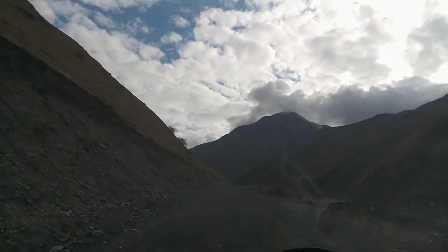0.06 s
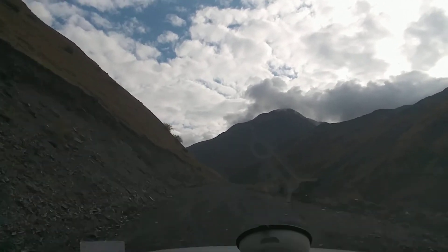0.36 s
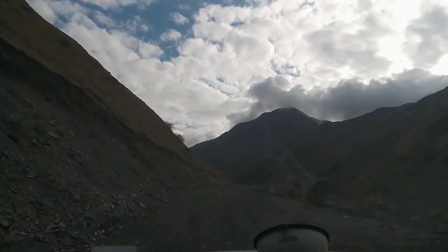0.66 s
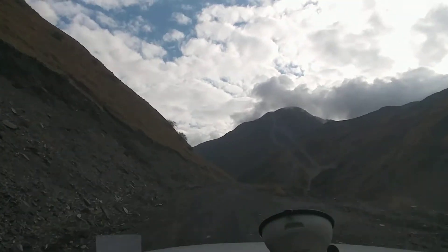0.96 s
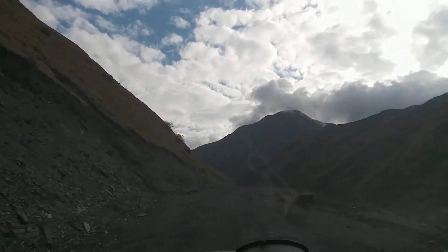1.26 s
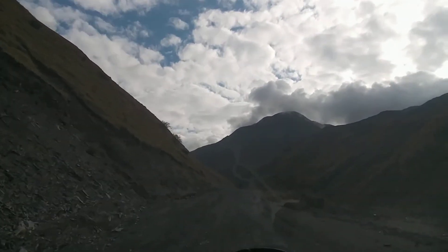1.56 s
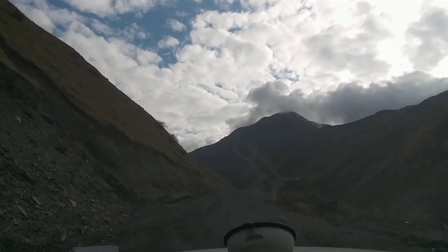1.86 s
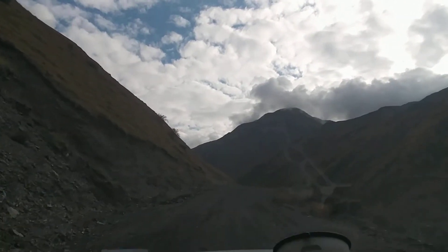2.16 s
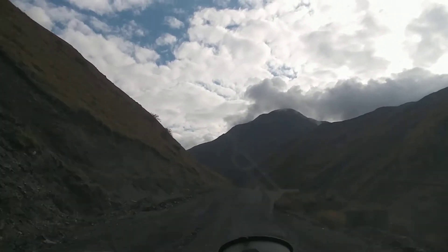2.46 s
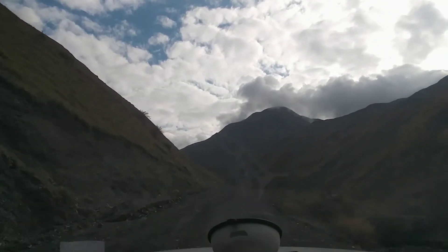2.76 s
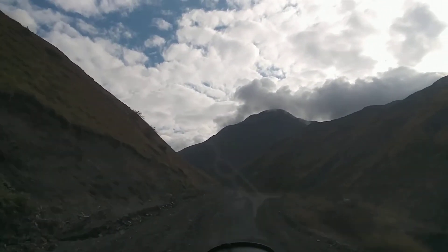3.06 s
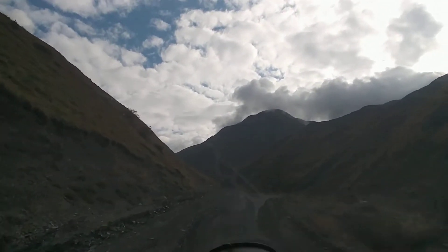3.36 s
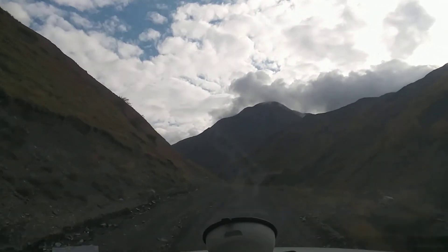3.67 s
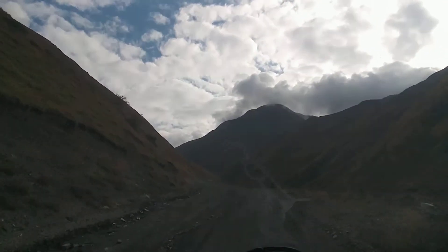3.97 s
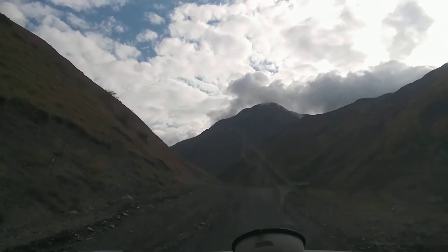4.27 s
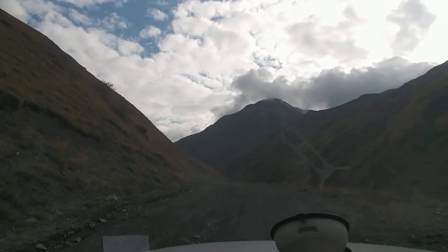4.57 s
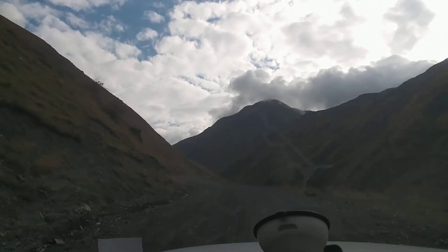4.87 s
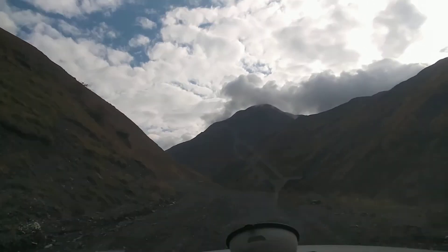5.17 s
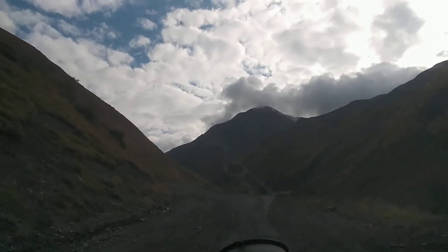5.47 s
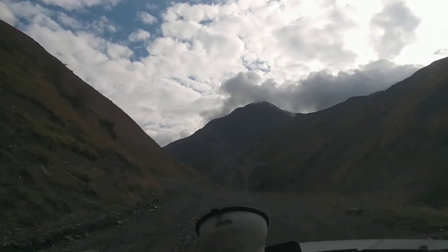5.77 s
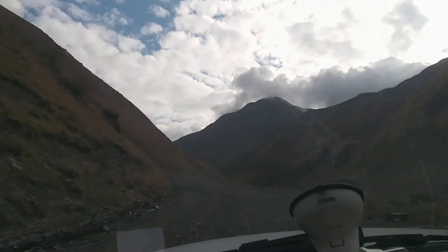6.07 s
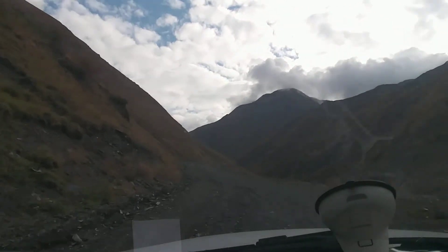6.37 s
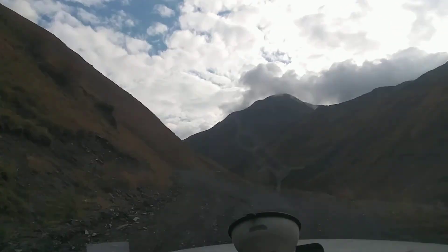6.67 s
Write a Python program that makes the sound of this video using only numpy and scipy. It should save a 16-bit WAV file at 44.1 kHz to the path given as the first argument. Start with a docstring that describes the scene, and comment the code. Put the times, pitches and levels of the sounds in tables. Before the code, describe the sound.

Inside an off-road car driving along a rough gravel track, heard from behind the windscreen. A loud, deep boom throbs unevenly throughout as the wheels cross ruts, over tyre roar and a low engine hum with a faint whine. The suspension thumps again and again, stones chatter and snap against the underside, and loose fittings knock. Trim rattles in bursts with a few faint squeaks. The clatter eases somewhat in the second half.

```python
"""Inside an off-road car on a rough gravel mountain track, behind the windscreen.
Ruts pump the cabin air into a deep boom, the track drums on the panels, the suspension thumps.
Gravel roars, chatters and snaps under the tyres; loose fittings knock, trim rattles and squeaks.
The engine hums and the driveline whines faintly. A limiter holds the boom near full scale."""
import sys
import numpy as np
from scipy import signal
from scipy.fft import rfft, irfft, next_fast_len
from scipy.io import wavfile
from scipy.ndimage import uniform_filter1d, minimum_filter1d

SR = 44100
rng = np.random.default_rng(int(sys.argv[2]) if len(sys.argv) > 2 else 0)


def log_audio(samples):
    """Write samples as a 16-bit WAV file to the path given in sys.argv[1]."""
    # one column per channel
    frames = np.atleast_2d(samples).T
    # limit to full scale, then quantise
    limited = np.clip(frames, -1, 1)
    pcm = np.round(limited * 32767).astype(np.int16)
    wavfile.write(sys.argv[1], SR, pcm)


N = 295911
TIME_S = np.arange(N) / SR

# Deep ruts. Each row: centre in seconds, level in dB, pitch in Hz.
RUTS = [(0.149, -3.5, 78.7), (.268, -2.5, 62.2), (0.544, 0, 67.4), (0.846, -7, 70), (1.052, 0, 74.8),
        (1.46, -5.5, 65.4), (1.8, -0.5, 62.8), (2.218, -4, 63.3), (2.42, 0, 70.8), (2.527, -5, 73.5),
        (2.747, -4.5, 67.8), (3.01, -4.5, 65.5), (3.212, -2.5, 70.1), (3.69, -6, 61.5), (3.96, -5.5, 70.7),
        (4.3, -5.5, 70.1), (4.736, -3, 79.7), (5.067, -2, 63.9), (5.2, -2.5, 64.2), (5.33, -3.5, 72.3),
        (5.45, -10, 71.2), (5.559, -7.5, 66.9), (5.97, -6, 68), (6.057, -3, 73.3), (6.33, -3.5, 64),
        (6.443, -2, 74.8), (6.534, -3, 59.8)]
# Strength of lesser throbs and rumble. Each row: time in seconds, level in dB.
WASHBOARD = [(0, -7.5), (.4, -6), (1.4, -8), (2.74, -5), (2.81, -8.5), (2.91, -18.5), (3.0, -5), (4.8, -7),
             (5.33, -3), (5.4, -11.5), (5.5, -5), (5.76, -6), (5.82, -11.5), (5.9, -5.5), (6.55, -9),
             (6.63, -11.5)]
# Track roughness. Each row: time in seconds, roughness over average ground in dB.
ROUGHNESS = [(0, 6.5), (.4, -1), (.52, 4.5), (.64, 2), (.82, -3), (1.0, 4.5), (1.11, -3), (1.3, 4.5),
             (1.66, 2.5), (1.77, 2), (1.86, 4.5), (1.95, 3.5), (2.1, 0.5), (2.28, 3.5), (2.7, 3),
             (2.8, -4.5), (3.15, 2.5), (3.58, -2), (3.68, -0.5), (3.76, -4), (3.9, -6), (3.98, -4),
             (4.08, -0.5), (4.57, 0), (4.67, 3.5), (4.8, 0.5), (4.9, 0.5), (4.96, -7.5), (5.04, -0.5),
             (5.2, 4), (5.44, -3), (5.9, -1), (6.71, -2)]
# Suspension thumps. Each row: time in seconds, level in dB, clunk offset in dB.
THUMPS = [(0.243, -10, -20), (0.364, -28.5, 11.5), (0.421, -11.5, -13), (1.028, -8.5, -8.5),
          (1.369, -18.5, -3.5), (1.92, -14, -10.5), (2.519, -20.5, -18.5), (2.594, -10.5, -21.5),
          (3.165, -11, -26), (3.324, -26, -3), (3.348, -21.5, 0), (3.561, -5, -26), (3.624, -11.5, -33),
          (4.104, -10, -24), (4.597, -10.5, -10), (4.621, -8, -16), (4.79, -13.5, -23), (5.133, -18.5, -7),
          (5.704, -16.5, -12), (5.785, -12.5, -24), (5.873, -22, -7.5), (5.904, -6, -32),
          (6.152, -16.5, -27)]
# Engine firing note. Each row: time in seconds, level in dB.
ENGINE = [(0, -23), (1.5, -18), (2.8, -28), (3.2, -19.5), (4.2, -22.5), (4.8, -17), (5.4, -19.5),
          (6.4, -17), (6.71, -32.5)]
# Blows on the body shell. Each row: start in seconds, level in dB, pitch in Hz.
SHELL_BLOWS = [(.243, -16, 350), (.638, -24, 360), (1.026, -17, 342), (1.194, -21, 376), (2.608, -20, 396),
               (2.642, -25, 463), (3.336, -23, 456), (3.36, -20, 423), (3.423, -20, 488),
               (3.484, -13.5, 310), (3.542, -13, 320), (3.57, -18, 295), (3.668, -26, 393),
               (4.159, -22, 343), (4.338, -18, 352), (4.594, -16.5, 441), (4.62, -22, 520),
               (5.139, -17, 376)]
# Knocks of a loose fitting. Each row: start in seconds, level in dB, panel re ring in dB.
KNOCKS = [(0.1658, -25.5, -1), (0.329, -30.5, -15), (0.392, -31.5, -14), (0.589, -35.5, -3),
          (.6994, -40, -8), (0.9577, -33, -6), (1.0157, -28, -13), (1.1488, -38.5, -8), (1.195, -31, -10),
          (1.3783, -35, -4), (1.436, -37, -4), (1.4642, -42, -4), (1.513, -28.5, 0.5), (1.5747, -34.5, 0),
          (1.6433, -32.5, -10), (1.743, -34, -3), (1.8648, -34, 5), (1.923, -33, 7), (2.0528, -36, 2),
          (2.159, -39, -5), (2.238, -35, 3), (2.312, -31, -4), (2.3723, -32, -16), (2.425, -33, 3),
          (2.487, -30.5, -1.5), (2.623, -27, -7), (2.689, -29.5, -7), (2.9668, -37, 6), (3.0046, -40, -10),
          (3.0747, -37, 0), (3.245, -32, -1), (3.324, -34, 0), (3.5794, -33, 1), (3.6647, -35.5, -6),
          (3.7944, -38.5, -1), (3.947, -43.5, 12), (4.0034, -40, 0), (4.027, -34.5, 6.5),
          (4.2943, -35, 2.5), (4.3257, -34, -8), (4.3992, -39, -2), (4.431, -37, -2), (4.561, -40, -8),
          (4.6677, -30, -16), (4.698, -33.5, 2.5), (4.7163, -37, 2), (4.7552, -34, -2), (4.82, -37, 2),
          (5.0146, -39, -2), (5.065, -32.5, 1), (5.131, -34, -4), (5.1986, -25, -14), (5.214, -31, -11),
          (5.265, -33, -3), (5.3247, -31.5, -6), (5.5763, -39, 0), (5.7686, -31, -15), (5.904, -37, -1),
          (6.2566, -39, -5), (6.3007, -40, 10)]
# Modes of the fitting. Each row: frequency in Hz, level in dB, T60 in seconds.
FITTING_MODES = [(950, -8, .05), (1150, -5, .04), (1380, -2, .04), (1500, -1, .045), (1640, 0, .045),
                 (1845, 0, .045), (2400, -9, .03), (2650, -9, .03), (3080, -12, .025)]
# Stone snaps. Each row: start in seconds, level in dB.
SNAPS = [(0.0924, -28), (0.2208, -30), (0.575, -29), (.6714, -31), (0.7142, -30.5), (0.7452, -30.5),
         (0.902, -33.5), (1.1932, -29.5), (1.2228, -30), (1.4442, -30), (1.5896, -29), (1.9544, -34.5),
         (2.164, -34), (2.3112, -34.5), (2.505, -31), (2.591, -29), (3.0032, -30.5), (3.3204, -33.5),
         (3.4283, -27), (3.4735, -32), (3.4978, -29), (3.556, -32), (3.664, -34.5), (3.714, -34.5),
         (4.165, -40), (4.3122, -36), (4.8214, -37), (5.2105, -30.5), (5.2644, -33.5), (5.7728, -30.5)]
# Jolts. Each row: start in seconds, rattle level in dB, hold in seconds, jingle re rattle in dB.
JOLTS = [(.003, -36, 0.062, -3.5), (0.091, -36.5, 0.076, -10), (0.22, -38, 0.032, -8),
         (0.327, -35, 0.082, -10.5), (0.564, -38, 0.036, -10.5), (0.67, -38.5, 0.082, -16),
         (0.887, -33.5, 0.018, -19), (1.011, -32.5, 0.038, -11.5), (1.18, -38, 0.026, -11),
         (1.281, -38, 0.086, -9.5), (1.442, -40.5, 0.12, -12), (1.645, -41, 0.056, -11),
         (1.82, -34.5, 0.14, -25), (2.18, -35.5, 0.071, -11.5), (2.278, -39, 0.069, -4),
         (2.595, -32, 0.054, -11.5), (2.711, -32.5, 0.026, -19.5), (3, -37.5, 0.0099, -24),
         (3.238, -41, 0.014, -18), (3.097, -43, 0.031, -15), (3.374, -40.5, 0.026, -8.5),
         (3.421, -39, 0.1, -12), (3.552, -32.5, 0.039, -17.5), (3.66, -43, 0.018, -24),
         (4.01, -39, 0.062, -16), (4.311, -37, 0.062, -29.5), (4.432, -42.5, 0.062, -11.5),
         (4.678, -45, 0.053, -15), (4.745, -50, 0.022, 1), (4.83, -42.5, 0.088, -16),
         (5.104, -38.5, 0.033, -11.5), (5.198, -37, 0.018, -3.5), (5.297, -44, 0.052, -11.5),
         (5.62, -45.5, 0.069, -11), (5.769, -47, 0.16, -4.5), (5.948, -39.5, 0.025, -4),
         (6.076, -52, 0.045, -2), (6.194, -53.5, 0.066, -3), (6.413, -48, 0.086, -4)]
# Resonances of small metal parts. Each row: centre in Hz, gain of the added band in dB.
METAL_BANDS = [(4430, -6), (5790, -8), (7600, -8), (8950, -4)]
# Gears. Each row: time in seconds, mesh pitch in Hz, mesh level in dB, upper pair level in dB.
GEARS = [(0, 357.2, -35.5, -56), (.8, 360.4, -37, -50), (1.2, 358.2, -35, -43), (2, 353.2, -35.5, -44),
         (2.7, 351, -36, -47.5), (3.2, 350, -38, -48), (4.3, 344.2, -38.5, -53.5), (5.2, 348, -37, -46.5),
         (5.8, 347.4, -42, -52.5), (6.0, 345.7, -36.5, -42.5), (6.6, 347.2, -38, -46)]
# Upper gear tones. Each row: multiple of the mesh pitch, level offset in dB.
UPPER_PAIR = [(2.475, -5), (2.53, 0)]
# Axle whine. Each row: time in seconds, pitch in Hz, level in dB.
AXLE = [(0, 760, -44.5), (.35, 760, -47.5), (.8, 737, -47), (2.0, 725, -46), (2.6, 735, -46),
        (3.0, 730, -43.5), (3.6, 715, -48), (4.2, 703, -46), (4.8, 712, -45), (5.4, 722, -50.5),
        (5.9, 724, -46), (6.3, 720, -43.5), (6.71, 723, -54)]
# Two engine drone tones. Each row: time in seconds, lower tone level in dB, upper tone level in dB.
DRONE = [(0, -27, -63), (1, -34, -62), (1.6, -42, -61), (5.8, -43, -56), (6.05, -41.5, -47),
         (6.71, -38, -42)]
# Trim squeaks. Each row: start in seconds, level in dB, length in seconds.
SQUEAKS = [(1.391, -46, .03), (1.442, -55, .025), (1.485, -48, .05), (1.665, -51, .03), (2.912, -51, 0.03),
           (3.595, -50, 0.042), (3.658, -53, .025), (4.084, -55, .035), (5.633, -53, 0.058)]
# Left-right likeness of cabin noise. Each row: frequency in Hz, coherence from 0 to 1.
COHERENCE = [(60, 0.95), (120, 0.96), (250, 0.83), (500, 0.54), (1000, 0), (4000, 0)]
# Spectra of the noise layers. Each row: frequency in Hz, relative gain in dB.
RUMBLE_EQ = [(15, -29.5), (28, -28), (36, -21.5), (46, -3), (57, 9.5), (68, -3.5), (80, -5.5), (92, 5.5),
             (110, -16.5), (170, -39)]
PANEL_EQ = [(50, -35.5), (85, -4), (108, 2.5), (135, -3.5), (165, -6), (205, -9), (245, -14.5),
            (300, -15.5), (380, -29.5), (600, -37.5), (1500, -89)]
TYRE_EQ = [(150, -25.5), (300, 1), (380, -0.5), (480, -1), (600, -5), (700, -7), (800, -9.5), (880, -9),
           (960, -13), (1300, -17), (2200, -23), (4000, -31.5), (9000, -76)]
SNAP_EQ = [(600, -25.5), (1300, 0.5), (2000, 0.5), (2600, -0.5), (2980, 6.5), (3400, 0), (4300, -7.5),
           (5500, -17), (8000, -21), (9600, -41.5)]
TRIM_EQ = [(400, -25.5), (800, 7.5), (1350, 5.5), (1850, -1.5), (2300, -1.5), (3100, -5), (3700, -7.5),
           (4400, -12), (5200, -21), (9000, -48.5)]
GRAVEL_EQ = [(400, -30.5), (900, 2.5), (1350, 6), (1650, -1), (2100, -3), (2600, -4.5), (3150, -4),
             (3700, -12), (4400, -20), (5200, -27), (9000, -51.5)]
JINGLE_EQ = [(1500, -20), (3000, 2.5), (4300, 3.5), (5200, -1), (6500, -3), (7700, -4.5), (8700, -11),
             (9600, -23), (10500, -32.5), (15000, -21.5)]
THUD_EQ = [(70, -25.5), (170, 3), (240, 0), (330, -9.5), (450, -22), (1000, -55.5)]
CLUNK_EQ = [(200, -26.5), (380, .5), (520, -1.5), (700, -10), (1100, -16), (3000, -66)]
HISS_EQ = [(2000, -9), (5000, -7), (8000, -2.5), (9800, -20), (15000, -14)]


def boom(throb_s=.128, sway_depth=.12, sway_hz=9, rumble_db=-7):
    """Each rut pumps the cabin air through a few deep swings, over a low rumble."""
    throbs = np.zeros((2, N))
    swell = np.hanning(int(throb_s * SR)) ** .75
    t = TIME_S[:len(swell)]
    for centre_s, db, hz in list(RUTS) + lesser_ruts():
        start_cycles, sway_cycles = rng.random(2)
        # Neighbouring air modes take turns, so the pitch sways.
        sway = sway_depth * np.sin(2 * np.pi * (sway_cycles + sway_hz * t))
        phase = 2 * np.pi * (start_cycles + np.cumsum(hz * (1 + sway)) / SR)
        add(throbs, undb(db + 1) * swell * np.sin(phase + np.array([[.1], [0]])), centre_s - throb_s / 2)
    rumble = steady(colour(cabin_noise(), RUMBLE_EQ), span_s=.082)
    rumble *= undb(curves(WASHBOARD)[0] + rumble_db)
    rocking = undb(np.array([[1], [-1]]) * walk(18))  # pressure shifts from side to side
    return pan(throbs * rocking + rumble, left_db=1)


def lesser_ruts(spacing_s=.108, pitch_hz=69):
    """The wheels hop at a nearly even pace between deep ruts; rows as in RUTS."""
    marks_s = [-spacing_s / 2] + [rut[0] for rut in RUTS] + [TIME_S[-1] + spacing_s / 2]
    hops_s = []
    for from_s, to_s in zip(marks_s, marks_s[1:]):
        steps = max(round((to_s - from_s) / spacing_s), 1)
        hops_s.extend(np.linspace(from_s, to_s, steps + 1)[1:-1])
    late, strength, detune = rng.standard_normal((N // 1000, 3))[:len(hops_s)].T
    db = np.interp(hops_s, *np.transpose(WASHBOARD)) + .5 * strength
    return list(zip(hops_s + .0054 * late, db, pitch_hz + 5.33 * detune))


def panel_drumming():
    """The track drums on floor and doors."""
    drumming = steady(colour(cabin_noise(), PANEL_EQ), span_s=.14)
    return pan(drumming * road_gain(-16, slope=.84, flutter_db=1.75), left_db=1)


def tyre_roar():
    """Stones roar through the tyres."""
    roar = colour(cabin_noise() * undb(1.47 * walk(70)), TYRE_EQ)
    return pan(roar * road_gain(-29.5, slope=.71), left_db=3.5)


def suspension_thumps(t60_s=.1, rise_s=.018, lead_s=.004):
    """A wheel drops into a hole and shakes dense body modes; sharp edges add a higher clunk."""
    thud_gain, clunk_gain = np.zeros((2, N))
    t = TIME_S[:SR // 4]
    push = fade(t, t60_s) * (1 - fade(t, rise_s))
    for time_s, db, clunk_db in THUMPS:
        add(thud_gain, undb(db - 1) * push, time_s - lead_s)
        add(clunk_gain, undb(db + clunk_db + 1.5) * push, time_s - lead_s)
    thud = steady(colour(cabin_noise(), THUD_EQ), span_s=.01)
    clunk = steady(colour(cabin_noise(), CLUNK_EQ), span_s=.0099)
    return pan(thud * thud_gain + clunk * clunk_gain, left_db=1.5)


def engine_hum():
    """The engine hums at its firing rate, two octaves under the gear mesh."""
    firing_hz = curves(GEARS)[0] / 4
    return pan(tone(firing_hz, curves(ENGINE)[0], lead_rad=.1, waver=.004), left_db=.8)


def shell_thuds(t60_s=.039, contact_s=.007, overtone_ratio=1.42, overtone_db=-11):
    """A blunt blow rings one panel of the shell, briefly and hollowly."""
    out, t = np.zeros((2, N)), TIME_S[:SR // 5]
    attack = np.sin(np.pi / 2 * np.minimum(t / contact_s, 1)) ** 2
    envelope = attack * fade(np.maximum(t - contact_s, 0), t60_s)
    for start_s, db, hz in SHELL_BLOWS:
        phase = 2 * np.pi * hz * t + .5 * rng.standard_normal((2, 1))
        ring = np.sin(phase) + undb(overtone_db) * np.sin(overtone_ratio * phase)
        add(out, undb(db) * envelope * ring, start_s)
    return pan(out, left_db=-.5)


def fitting_knocks(bounce_s=.003, bounce_db=-8, left_lead_s=.00012):
    """A loose fitting left of centre clacks grittily and bounces once; its panel adds a dull note."""
    out, t = np.zeros((2, N)), TIME_S[:SR // 8]
    mode_hz, mode_db, t60_s = np.transpose(FITTING_MODES)[:, :, None]
    for start_s, db, panel_db in list(KNOCKS) + taps():
        detune, strength = rng.standard_normal((2, len(FITTING_MODES), 1))
        seating = 1 + .035 * rng.standard_normal()  # it sits differently each time
        modes = np.sin(2 * np.pi * mode_hz * seating * (1 + .02 * detune) * t)
        envelopes = undb(mode_db + 3.5 * strength) * fade(t, t60_s)
        ring = band(np.sum(envelopes * modes, axis=0), 600, 3500)
        grit = rng.standard_normal(len(t)) * (rng.random(len(t)) < .04)
        crack = band(grit, 1000, 3400) * fade(t, .04)
        panel = band(rng.standard_normal(len(t)), 670, 1300) * fade(t, .047)
        blow = (unit(ring) + undb(-6) * unit(crack) + undb(panel_db) * unit(panel)) * undb(db - 15.2)
        direct = stereo(blow, -left_lead_s)
        add(out, direct + reflections(blow), start_s)
        add(out, direct * undb(bounce_db), start_s + bounce_s * (.5 + rng.random()))
    return pan(out, left_db=1)


def taps(count=8, base_db=-40, spread_db=2.5, panel_db=-4.5):
    """Light knocks at random times, harder on rough ground; rows as in KNOCKS."""
    starts_s = (np.arange(count) + rng.random(count)) / count * TIME_S[-1]
    levels_db = base_db + np.interp(starts_s, *np.transpose(ROUGHNESS))
    levels_db -= spread_db * rng.standard_normal(count)
    return [(start_s, db, panel_db) for start_s, db in zip(starts_s, levels_db)]


def stone_snaps(t60_s=.024, rebound_s=.0064, rebound_db=-7):
    """Stones crack against the underside and rebound once."""
    out, t = np.zeros((2, N)), TIME_S[:SR // 10]
    for start_s, db in SNAPS:
        contact = rng.standard_normal((2, len(t))) * fade(t, t60_s)
        gap_s = rebound_s * (.5 + rng.random())
        add(out, contact * undb(db), start_s)
        add(out, contact[::-1] * undb(db + rebound_db), start_s + gap_s)
    return colour(out, SNAP_EQ) * np.std(out) * undb(-5)


def chatter():
    """Gravel chatters throughout; jolts shake the trim in coarse bursts."""
    gravel = colour(contacts(rate_hz=900, spread_db=3.4, t60_s=.025, wet_db=1), GRAVEL_EQ)
    trim = colour(contacts(rate_hz=800, spread_db=2.6, t60_s=.03, wet_db=4), TRIM_EQ)
    gravel_gain = road_gain(-45.5, slope=1, flutter_db=-.5) * pre_jolt_swell()
    trim_gain, _ = jolt_gains()
    return pan(gravel * gravel_gain + trim * trim_gain, left_db=-.5)


def metal_jingle(half_width_hz=70):
    """Rough ground and jolts set small metal parts ringing."""
    hits = colour(contacts(rate_hz=600, spread_db=2, t60_s=.03, wet_db=8), JINGLE_EQ)
    ring = sum(undb(db) * band(hits, hz - half_width_hz, hz + half_width_hz) for hz, db in METAL_BANDS)
    ground_gain = road_gain(-58.5, slope=1.5, flutter_db=1.5) * pre_jolt_swell()
    _, jolt_gain = jolt_gains()
    return pan(unit(hits + ring) * np.hypot(ground_gain, jolt_gain), left_db=1.5)


def jolt_gains(attack_s=.0016, t60_s=.16):
    """Trim and jingle gains: each jolt starts them, holds, then lets them settle."""
    gains, t = np.zeros((2, N)), TIME_S[:SR // 2]
    for start_s, db, hold_s, jingle_db in JOLTS:
        envelope = np.minimum(t / attack_s, 1) * fade(np.maximum(t - hold_s, 0), t60_s)
        add(gains, undb([[db], [db + jingle_db]]) * envelope, start_s)
    return gains


def pre_jolt_swell(length_s=.071, rise_db=2):
    """Gain that rises slightly just before each jolt."""
    db = np.zeros(N)
    for start_s, *_ in JOLTS:
        add(db, rise_db * np.sqrt(np.hanning(int(length_s * SR))), start_s - length_s)
    return undb(db)


def driveline_whine(drone_ratios=(.795, 1.631)):
    """The engine drones, the axle whines and meshing gears sing faintly."""
    mesh_hz, mesh_db, upper_db = curves(GEARS)
    drone = sum(tone(mesh_hz * ratio, db, lead_rad=1) for ratio, db in zip(drone_ratios, curves(DRONE)))
    mesh = tone(mesh_hz, mesh_db, lead_rad=.41)
    axle = tone(*curves(AXLE), lead_rad=-.05, waver=.006, flutter_db=3)
    upper = sum(tone(mesh_hz * ratio, upper_db + db, lead_rad=-1.6, waver=.00802, flutter_db=3)
                for ratio, db in UPPER_PAIR)
    return pan(mesh + axle + drone, left_db=.5) + pan(upper, left_db=-5)


def trim_squeaks(pitch_hz=4330, half_width_hz=240, grain_db=3):
    """Plastic trim sticks and slips in rough, thin chirps."""
    envelope = np.zeros(N)
    for start_s, db, length_s in SQUEAKS:
        add(envelope, undb(db) * np.sqrt(np.hanning(int(length_s * SR))), start_s)
    rub = band(rng.standard_normal((2, N)), pitch_hz - half_width_hz, pitch_hz + half_width_hz)
    return envelope * unit(rub * undb(grain_db * walk(160)))


def hiss(level_db=-62):
    """Faint, even hiss."""
    return colour(rng.standard_normal((2, N)), HISS_EQ) * undb(level_db)


def road_gain(base_db, slope, flutter_db=0):
    """Gain that follows ground roughness (slope in dB per dB) and flutters from stone to stone."""
    return undb(base_db + slope * curves(ROUGHNESS)[0] + flutter_db * walk(22))


def contacts(rate_hz, spread_db, t60_s, wet_db, left_lag_s=.00039):
    """Tiny random impacts from the right, a few much harder; each leaves its own diffuse tail."""
    hardness = np.minimum(rng.exponential(size=N), 4)
    clicks = (rng.random(N) < rate_hz / SR) * rng.choice([-1, 1], N) * undb(spread_db * hardness)
    tail = fade(TIME_S[:SR // 10], t60_s) ** 2
    tail_power = np.abs(signal.fftconvolve(clicks ** 2, tail / tail.sum())[:N])
    return stereo(clicks, left_lag_s) + undb(wet_db) * np.sqrt(tail_power) * rng.standard_normal((2, N))


def tone(hz, db, lead_rad, waver=.0045, flutter_db=2):
    """Wavering tone; cabin standing waves shift its phase on the left."""
    phase = 2 * np.pi * np.cumsum(hz * (1 + waver * walk(25))) / SR
    return np.sqrt(2) * undb(db + flutter_db * walk(16)) * np.sin(phase + np.array([[lead_rad], [0]]))


def cabin_noise():
    """Random stereo pressure; long waves reach both sides alike."""
    size = next_fast_len(N)
    mid, side = rfft(rng.standard_normal((2, size)))
    coherence = over_hz(COHERENCE, size)
    mid, side = mid * np.sqrt(1 + coherence), side * np.sqrt(1 - coherence)
    return irfft(np.array([mid + side, mid - side]), size)[:, :N]


def reflections(x, t60_s=.06, delay_s=.002, wet_db=-3):
    """Dense echoes off glass and trim."""
    t = TIME_S[:len(x)]
    response = rng.standard_normal((2, len(t))) * fade(t, t60_s) * (t > delay_s)
    echoes = signal.fftconvolve(x[None], response, axes=1)[:, :len(x)]
    return unit(echoes) * np.std(x) * undb(wet_db)


def cabin_null(x, centre_hz=95.3, width_hz=13.3, depth_db=-7):
    """A standing wave cancels a narrow band at the windscreen."""
    size = next_fast_len(N + SR // 2)
    dip = np.exp(-((np.fft.rfftfreq(size, 1 / SR) - centre_hz) / (width_hz / 2)) ** 2)
    return irfft(rfft(x, size) * undb(depth_db * dip), size)[:, :N]


def colour(x, eq):
    """Shape the spectrum, rolling off an octave above the last row; rms 1."""
    size = next_fast_len(N)
    cutoff_hz = 2 * eq[-1][0]
    rolloff = 1 / (1 + (np.fft.rfftfreq(size, 1 / SR) / cutoff_hz) ** 4)
    return unit(irfft(rfft(x, size) * undb(over_hz(eq, size)) * rolloff, size)[..., :N])


def over_hz(table, size):
    """Interpolate (Hz, value) rows at FFT bins, in log frequency."""
    hz, value = np.transpose(table)
    return np.interp(np.log(np.fft.rfftfreq(size, 1 / SR) + 1e-3), np.log(hz), value)


def curves(table):
    """Interpolate each value column over time."""
    times_s, *columns = np.transpose(table)
    return [np.interp(TIME_S, times_s, column) for column in columns]


def steady(x, span_s):
    """Even out swells slower than the span."""
    size = int(span_s * SR)
    power = uniform_filter1d(uniform_filter1d(np.mean(x ** 2, axis=0), size), size)
    return x / np.sqrt(power + 1e-9)


def walk(rate_hz):
    """Smooth random wander, spread near 1."""
    size = int(SR / rate_hz)
    steps = np.repeat(rng.standard_normal(N // size + 1), size)
    return 1.193 * uniform_filter1d(steps, size)[:N]


def band(x, low_hz, high_hz):
    """Steep band-pass."""
    return signal.sosfilt(signal.butter(4, [low_hz, high_hz], "band", fs=SR, output="sos"), x)


def stereo(x, left_lag_s):
    """The direct path reaches the two sides slightly apart."""
    return np.array([np.roll(x, round(left_lag_s * SR)), x])


def pan(x, left_db):
    """Set the level of left over right."""
    return x * undb(np.array([[left_db], [-left_db]]) / 2)


def add(out, sound, start_s):
    """Mix a sound in at a time."""
    start = max(int(start_s * SR), 0)
    out[..., start:start + sound.shape[-1]] += sound[..., :max(N - start, 0)]


def fade(t, t60_s):
    """Exponential decay."""
    return np.exp(-np.log(1000) * t / t60_s)


def unit(x):
    """Scale to rms 1."""
    return x / np.sqrt(np.mean(x ** 2))


def undb(db):
    """Decibels to gain."""
    return 10 ** (np.asarray(db) / 20)


def scene():
    """All sources, as heard behind the windscreen."""
    road = cabin_null(boom() + panel_drumming() + tyre_roar() + suspension_thumps())
    bed = engine_hum() + chatter() + metal_jingle() + hiss()
    impacts = fitting_knocks() + stone_snaps() + shell_thuds()
    return road + bed + impacts + trim_squeaks() + driveline_whine()


def record(dry, ceiling=1.0, hold_s=.022, cutoff_hz=15700):
    """A look-ahead limiter ducks the tallest swings; a low-pass cuts the top."""
    size = int(hold_s * SR) | 1
    allowed_gain = np.minimum(1, ceiling / (np.abs(dry).max(axis=0) + 1e-9))
    gain = uniform_filter1d(minimum_filter1d(allowed_gain, size), size)
    return signal.sosfilt(signal.ellip(8, .2, 70, cutoff_hz, fs=SR, output="sos"), dry * gain)


dry = scene()
out = record(dry)
log_audio(out)
```